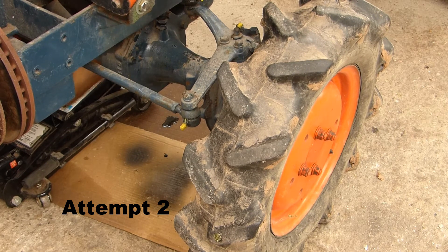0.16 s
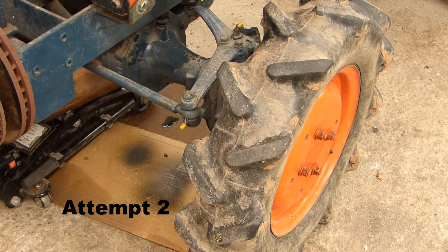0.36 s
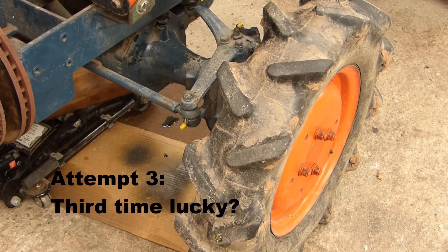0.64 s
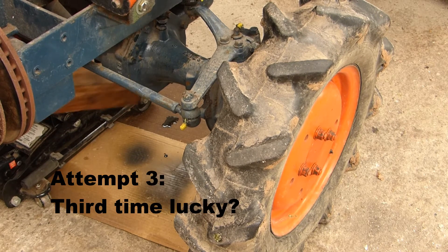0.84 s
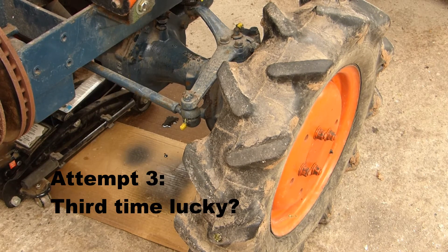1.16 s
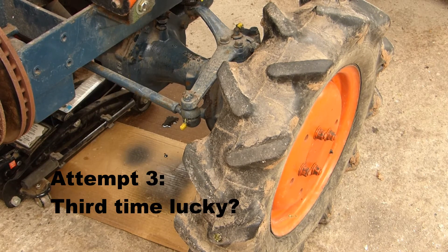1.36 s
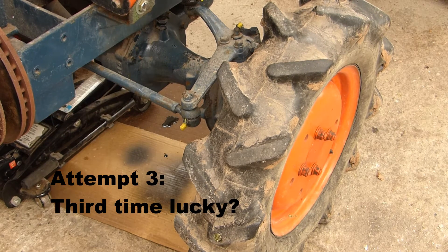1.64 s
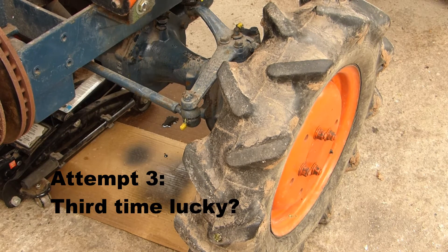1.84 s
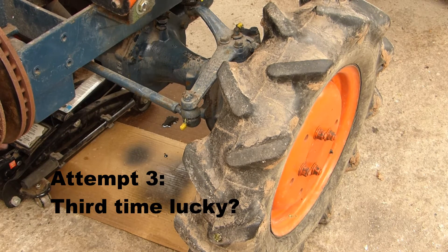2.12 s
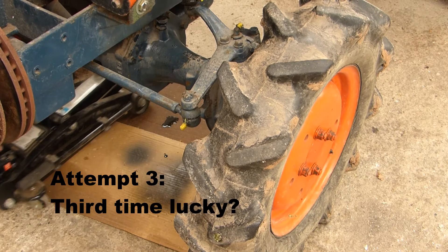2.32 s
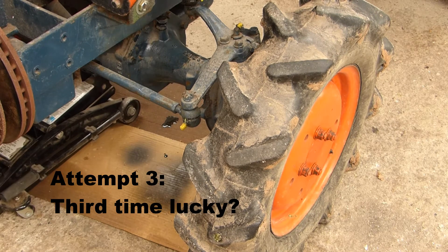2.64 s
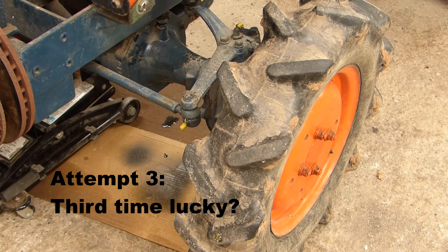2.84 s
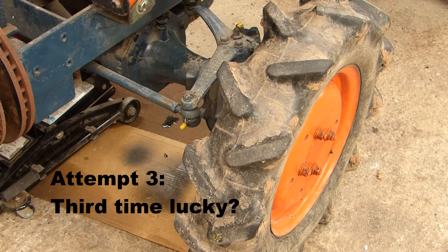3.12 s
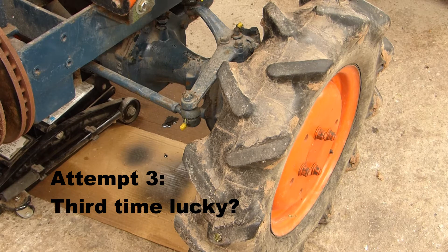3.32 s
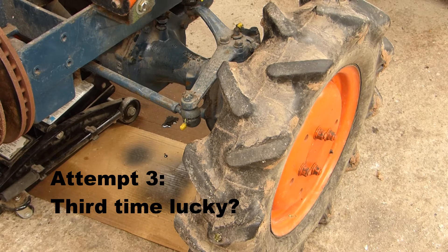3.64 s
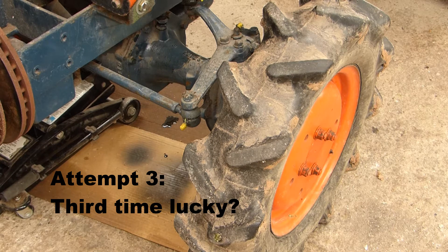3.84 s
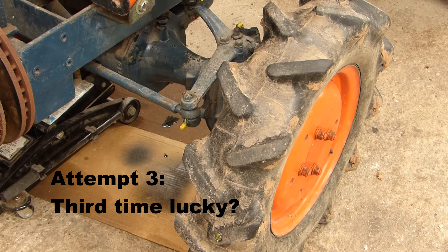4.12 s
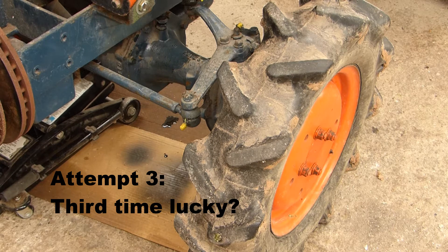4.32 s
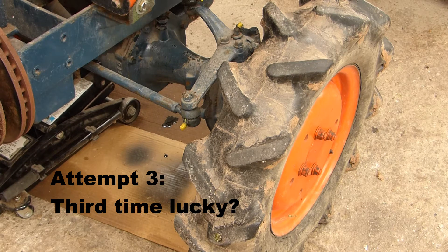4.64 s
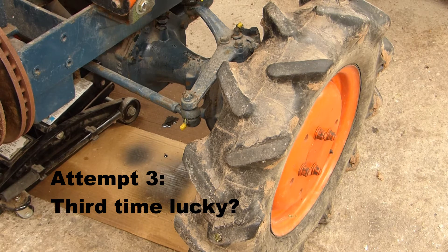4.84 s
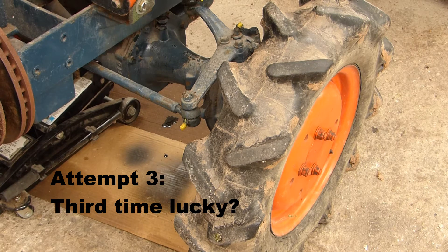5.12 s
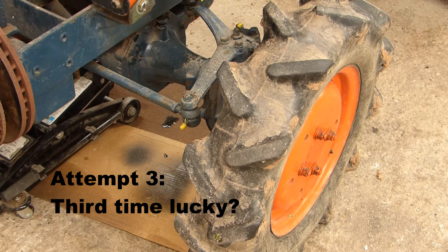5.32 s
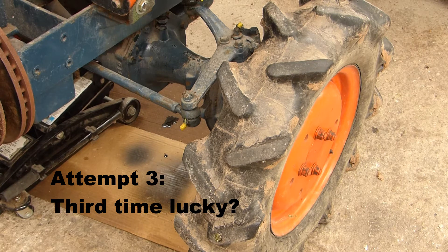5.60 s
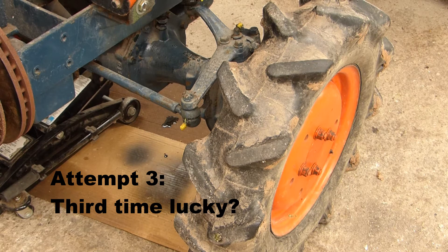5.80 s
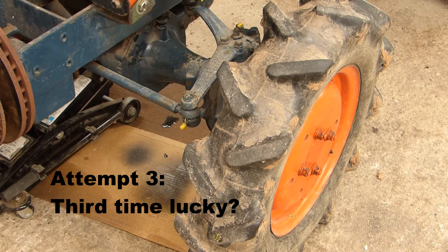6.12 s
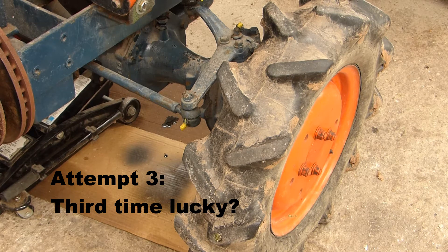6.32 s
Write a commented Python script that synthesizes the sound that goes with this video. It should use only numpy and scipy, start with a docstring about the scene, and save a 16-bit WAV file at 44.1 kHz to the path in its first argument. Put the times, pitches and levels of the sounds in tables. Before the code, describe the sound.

Close stereo sound of a heavy floor jack, slightly left of centre: an early hard steel clank, lighter taps, a pause, then two woody, dull blows, the second very loud. Castors rattle and grind across concrete in one short shove. Repeated pumping follows, with doubled clanks, loose ticks and high metallic pings. Hard garage walls give quick, dense echoes, with only faint room noise beneath.

```python
"""A hard-walled garage that rings for about a second, close to a steel trolley jack under a tractor. The jack
is shifted, two dull knocks follow, and it is shoved over the concrete on its castors. Then its handle is
pumped: the linkage clanks and the pins clink at each turn of the stroke. Contacts are shaped noise bursts that
excite ringing modes; loose parts, squeaks and the knock's ring are decaying, fluttering notes; rolling is noise
shaken by random hops. Noise echoes and faint room air surround it all."""
import sys
import numpy as np
from scipy import signal
from scipy.fft import rfft, irfft, next_fast_len
from scipy.io import wavfile

SR = 44100
rng = np.random.default_rng(int(sys.argv[2]) if len(sys.argv) > 2 else 0)


def bounce(signal):
    """Save signal as a 16-bit WAV file at the path given by the first command-line argument."""
    frames = np.transpose(np.atleast_2d(signal))
    limited = np.clip(frames, -1, 1)
    pcm = np.round(limited * 32767).astype(np.int16)
    wavfile.write(sys.argv[1], SR, pcm)


N = 284886

# ringing modes of the steel frame: (f/Hz, level/dB relative to one another, t60/s)
FRAME_MODES = [(871, 17.5, 0.48), (1303, 13, 0.35), (1897, 3, 0.022), (2100, -14, 0.051), (3860, 9, 0.039),
               (6680, 14, 0.015), (7070, 7, 0.016), (8200, 10, 0.13), (10100, -1, 0.23)]


def amp(db):
    """Decibels to gain."""
    return 10 ** (np.asarray(db) / 20)


def unit(x):
    """Scale to rms 1."""
    return x / np.sqrt(np.mean(x ** 2) + 1e-20)


def along(points, hz):
    """(Hz, value) points read on a log axis."""
    f, v = np.transpose(points)
    return np.interp(np.log(hz + 1), np.log(f + 1), v)


def filtered(x, response):
    """x times a response of frequency."""
    m = next_fast_len(x.shape[-1] + SR // 4, True)
    spectrum = rfft(x, m) * response(np.fft.rfftfreq(m, 1 / SR))
    return irfft(spectrum, m)[..., :x.shape[-1]]


def causal(points, size):
    """Minimum-phase response with the gain of (Hz, dB) points, by folding the cepstrum."""
    cepstrum = irfft(np.log(amp(along(points, np.fft.rfftfreq(size, 1 / SR)))))
    cepstrum[1:size // 2] *= 2
    cepstrum[size // 2 + 1:] = 0
    return np.exp(rfft(cepstrum, size))


def resonances(modes, hz):
    """Summed response of ringing modes; the longer a mode rings, the narrower its peak."""
    total = 0
    for fc, db, t60 in modes:
        width = np.log(1000) / (np.pi * t60)
        total = total + amp(db) * 1j * hz * width / (fc * fc - hz * hz + 1j * hz * width)
    return total


def pair(count, side_db):
    """White stereo noise, mostly alike in both channels."""
    mid, side = rng.standard_normal((2, count))
    side = amp(side_db) * side
    return unit(np.array([mid + side, mid - side]))


def panned(x, pan_db):
    """Lean a sound to the left by pan_db."""
    return x * amp(np.array([[.5], [-.5]]) * pan_db)


def add(track, s, sound):
    """Mix a sound in at time s."""
    start = round(s * SR)
    track[:, start:start + sound.shape[-1]] += sound[..., :N - start]


def contacts(rows, modes, swell_s, ring_db, bass_db, dip_db, edge_db, tick_db, top_db, body_hz,
             rebound_db, rebound_life, size=16384):
    """Slack steel joints graze, chatter as they close, rebound faintly, and set the modes ringing."""
    lead = .01  # s of grazing ahead of the contact
    halving_db = 17  # a contact this much brighter closes in half the time
    edge_share, tick_share = 0.63, 1.21  # how far brightness lifts 5 kHz and 10 kHz
    firm_db, damping = -13.5, 0.45  # firmer blows press the parts together: dB of ring lost per dB
    detune, ring_scatter_db = 0.0081, 3.5  # spread of mode frequency (fraction) and level (dB)
    out = np.zeros((2, N))
    t = np.arange(size) / SR - lead
    hz = np.fft.rfftfreq(size, 1 / SR)
    rebounds = amp(rebound_db) * np.exp(np.minimum(t / 0.0034, -t / rebound_life))
    for s, db, thud, bright in rows:
        # the load on the joint differs at each contact and changes the modes a little
        loaded = []
        for fc, level, t60 in modes:
            loaded_hz = fc * (1 + detune * rng.standard_normal())
            loaded.append((loaded_hz, level + ring_scatter_db * rng.standard_normal(), t60))
        u = np.maximum(t, 0) / (swell_s * 2 ** (-bright / halving_db))
        closing = u * np.exp(1 - u)
        chatter = pair(size, side_db=-11.0) * np.hypot(closing, rebounds)
        edge = edge_db + edge_share * bright
        tick = tick_db + tick_share * bright
        colour = [(70, thud + bass_db), (145, thud), (450, thud), (1100, -1), (body_hz, 0),
                  (3000, edge / 2 + dip_db), (5000, edge), (10000, tick), (15000, tick + top_db)]
        ring = amp(ring_db - damping * max(db - firm_db, 0)) * resonances(loaded, hz)
        struck = irfft(rfft(chatter) * causal(colour, size) * (1 + ring))
        add(out, s - lead, amp(db) * struck)
    return out


def heavy_clanks():
    """Handle and frame clank, ringing the frame's modes."""
    # heavy contacts; from 3.5 s each pump stroke lands hard and turns back more lightly:
    # (t/s, level/dB, thud/dB, brightness/dB)
    clank_rows = [(.047, -32.5, 9.5, -7.5), (.212, -31, 5, -10), (.3058, -6, 3.5, 4),
                  (.3145, -23.5, 4.5, -4), (.665, -30, 16.5, -2.5), (.756, -21, -2, -15),
                  (.95, -19, -6, -9.5), (2.349, -15, -2.5, -9), (3.282, -27, -0.5, -1.5),
                  (3.587, -10, -10.5, -9.5), (3.618, -10, -10, -8.5), (3.625, -17.5, -1, -15),
                  (3.777, -21.5, -4.5, -20), (3.875, -14, -12.5, -16), (4.185, -30, 5, -2),
                  (4.2529, -10, -8, 5.5), (4.266, -7, -10.5, -10.5), (4.582, -19.5, -4, -20),
                  (4.691, -8.5, -31, -32), (4.712, -5.5, -17, -7), (4.935, -6.5, -8.5, -2),
                  (5.161, -17, -0.5, -0.5), (5.287, -20.5, -9.5, -19.5), (5.664, -14.5, -1.5, 6.5),
                  (5.672, -10, -8.5, -4.5), (5.921, -19.5, 2, -3.5), (6.046, -21, -11, -6),
                  (6.315, -38.5, 15, -6), (6.417, -9, -8, -22.5)]
    return contacts(clank_rows, FRAME_MODES, swell_s=0.0016, ring_db=-10.5, bass_db=-28, dip_db=-6,
                    edge_db=-2.5, tick_db=-8, top_db=-20, body_hz=2100,
                    rebound_db=-10.5, rebound_life=0.014)


def light_clinks():
    """Pins and castors clink, ringing higher and more numerous modes."""
    # light contacts: (t/s, level/dB, brightness/dB)
    clink_rows = [(2.39, -17.5, -7), (2.402, -9, 2.5), (2.668, -16.5, 8), (2.86, -17, 3),
                  (2.877, -12, -0.5), (2.913, -12, 3), (2.918, -14.5, 2.5), (3.006, -22, 5.5),
                  (3.134, -38.5, 11), (3.159, -30, 7), (3.256, -38, 12), (3.557, -27.5, -1.5),
                  (3.839, -18, -3), (3.9, -28, 10), (3.916, -17, 2.5), (3.985, -23.5, -14),
                  (4.146, -35.5, 3), (4.22, -27, 3), (4.48, -16.5, -3), (4.564, -27.5, 7), (4.848, -23, 7),
                  (5.2126, -20, 2.5), (5.278, -23, 6), (5.544, -44, 3), (5.589, -27.5, 3),
                  (6.025, -20.5, 2), (6.35, -26, 10)]
    # ringing modes of the pins: (f/Hz, level/dB relative to one another, t60/s)
    pin_modes = [(1750, 3.7, 0.027), (2107, 9.7, 0.036), (4037, 18, 0.099), (6360, 7.8, 0.032),
                 (7710, 5.1, 0.15), (9016, 14.8, 0.025), (9670, 12, 0.33), (9730, 17.1, 0.46),
                 (10550, 18, 0.47), (12200, 21, 0.2), (13250, 25.5, 0.06)]
    thud_db = -7  # the light parts all carry the same small thud
    rows = [(s, db, thud_db, bright) for s, db, bright in clink_rows]
    return contacts(rows, pin_modes, swell_s=0.002, ring_db=-4.0, bass_db=-20, dip_db=-3.5,
                    edge_db=-1.5, tick_db=-3.0, top_db=-19.0, body_hz=2020,
                    rebound_db=-12.0, rebound_life=0.028)


def shoving():
    """Each shove speeds the jack up, then lets it coast, growing duller: gains of whole and treble."""
    # shoves that drag castors and frame over the concrete:
    # (start t/s, length/s, level at top speed/dB, treble at half way/dB)
    shove_rows = [(-.06, 0.29, -45.5, -6), (0.314, 0.24, -36, -7), (0.834, 0.16, -41.5, -1),
                  (0.986, 0.11, -35, -5.5), (1.323, 0.16, -63.5, 13.5), (2.181, 0.087, -70.5, 17),
                  (2.288, 0.18, -45, -0.5), (2.342, 0.35, -19.5, -4), (3.396, 0.081, -41, -16),
                  (3.828, 0.11, -43, 9), (4.525, 0.31, -38.5, -2), (4.67, 0.2, -24.5, 3),
                  (5.95, 0.15, -45, 6.5), (6.313, 0.18, -38.5, -20)]
    push_share = 0.26  # the jack gathers speed for this share of a shove, then coasts to a stop
    speed_power = .7  # the gain grows as this power of the speed
    dulling_db = 9.5  # the treble sinks by this much from the start of a shove to its end
    t, gain, treble_gain = np.arange(N) / SR, np.zeros(N), np.zeros(N)
    for start, length, db, bright in shove_rows:
        u = np.clip((t - start) / length, 0, 1)
        speed = np.interp(u, [0, push_share, 1], [0, 1, 0])
        level = amp(db) * speed ** speed_power
        gain += level
        treble_gain += level * amp(bright - dulling_db * (u - .5))
    return gain, treble_gain


def rolling(bumps_per_s=420, bump_life=0.0037, grind=1.0, jerk_db=2.0):
    """Steel wheels hop over grains of concrete; every hop shakes the frame. The jack moves to the left."""
    # spectrum of wheels on grit: (f/Hz, relative level/dB)
    grit = [(35, -77), (60, -40), (198, -8.5), (294, -16.5), (593, -11), (698, -7), (1090, -2),
            (1280, -1.5), (1780, -2), (2900, -3.5), (8510, -9.5), (13300, -23), (16000, -37)]
    gain, treble_gain = shoving()
    t = np.arange(N) / SR
    hop_sizes = amp(2.2 * np.clip(rng.standard_normal(N), -2, 2))
    hops = (rng.random(N) < bumps_per_s / SR) * hop_sizes
    shake = unit(signal.lfilter([1], [1, -np.exp(-1 / (bump_life * SR))], hops))

    def body(hz):
        """The grit's colour with the frame's modes faintly on top."""
        return amp(along(grit, hz)) * (1 + amp(-26.0) * resonances(FRAME_MODES, hz))

    # the wheels catch and free themselves, so the grains come in clumps
    slow = unit(filtered(rng.standard_normal(N), lambda hz: np.exp(-(hz / 45) ** 2)))
    jerks = amp(jerk_db * slow)
    rattle = unit(filtered(pair(N, side_db=-10.5) * (grind + shake) * jerks, body))
    treble = filtered(rattle, lambda hz: hz ** 2 / (hz ** 2 + 2800 ** 2))
    sound = gain * (rattle - treble) + treble_gain * treble
    return panned(sound, np.interp(t, [2.5, 4.7], [-1, 4.5]))


def knock(s, spectrum, db, size=4096):
    """One clean, dull blow, as of a block set on the saddle: a single filtered push."""
    out, push = np.zeros((2, N)), irfft(causal(spectrum, size))
    add(out, s, amp(db) * push / np.abs(push).max())
    return out


def two_knocks():
    """A soft knock, then a much louder hard one."""
    # spectra of the two blows: (f/Hz, relative level/dB)
    soft_knock = [(29, -84), (50, -45), (267, -2.5), (595, -6.5), (985, -21.5), (1600, -19.5),
                  (2010, -33.5), (3400, -33), (3810, -38), (12000, -38), (15600, -85), (22000, -120)]
    hard_knock = [(40, -76), (121, -9), (370, -7.5), (579, -2), (1300, -2), (1790, -7), (2300, -19.5),
                  (3000, -22.5), (3700, -20), (4500, -29.5), (14000, -46.5)]
    return knock(1.6134, soft_knock, db=-15.5) + knock(1.7934, hard_knock, db=2.04)


def pings():
    """Single notes of loose parts, squeaking castors and the ringing hard knock; the higher the note, the
    faster it flutters."""
    # loose steel parts that sing on after a touch, squeaks of the castors, and the ring of the hard knock:
    # (t/s, f/Hz, level/dB, t60/s)
    ping_rows = [(.17, 7500, -48.5, .76), (.667, 545, -36, 0.35), (0.953, 1554, -26.5, 0.29),
                 (0.951, 4010, -33.5, 0.23), (.953, 467, -46, 1), (1.614, 3450, -49, 0.47),
                 (1.613, 4870, -36, 0.053), (1.8, 3626, -33, 0.46), (2.399, 8720, -9, .063),
                 (2.402, 4020, -18, .24), (2.668, 13100, -23, .15), (2.876, 1760, -24, 0.11),
                 (3.159, 9500, -30, 0.15), (3.841, 4035, -27, 0.61), (3.875, 2004, -19.5, 0.07),
                 (4.253, 6970, -12.5, 0.057), (4.688, 2286, -11, 0.062), (4.933, 7120, -20.5, 0.13),
                 (6.025, 13100, -29, 0.28), (6.418, 1870, -23.5, .14)]
    flutter_ratio, rough_at_db = 2.44, -30  # flutter over the clean note, for a note of this level
    rough_grows = 0.26  # dB of flutter gained per dB of level: hard-hit parts rattle more
    out, t = np.zeros((2, N)), np.arange(SR * 3 // 4) / SR
    for s, hz, db, t60 in ping_rows:
        rough = flutter_ratio * amp(rough_grows * (db - rough_at_db))
        noise = pair(len(t), side_db=-8)
        flutter = unit(filtered(noise, lambda f: np.exp(-(f / (.014 * hz)) ** 2)))
        note = (1 + rough * flutter) / np.hypot(1, rough) * np.sin(2 * np.pi * hz * t)
        onset = 1 - np.exp(-t / 0.00014)
        add(out, s, amp(db - 60 * t / t60) * onset * note)
    return out


def garage(x, gap=0.00022, build=0.0057, size=16384):
    """Echoes off the walls thicken quickly and die away, treble first; their pattern shifts steadily."""
    # how long the garage rings: (f/Hz, t60/s)
    ring_times = [(100, 1), (260, 0.79), (1200, 0.9), (4850, 0.78), (14000, 0.43)]
    # colour of the echo off the walls: (f/Hz, relative level/dB)
    wall_colour = [(60, 7.5), (140, -10.5), (300, 5.5), (1200, 1), (4000, 0.5), (14000, -0.5)]
    out, source = np.zeros((2, N)), np.pad(x.mean(axis=0), (0, size))
    for start in range(0, N, size // 2):  # overlapping pieces, each with its own echo pattern
        hz, age, z = signal.stft(pair(SR, side_db=-6.5), SR, nperseg=256)
        decay_db = 60 * age / along(ring_times, hz)[:, None]
        echo_gain = amp(along(wall_colour, hz)[:, None] - decay_db)
        tail = signal.istft(z * echo_gain, SR, nperseg=256)[1]
        t = np.arange(tail.shape[1]) / SR
        thickening = 1 - np.exp(-np.maximum(t - gap, 0) / build)
        tail = tail * thickening / np.sqrt(.055 * SR)
        piece = source[start:start + size] * signal.windows.cosine(size)
        add(out, start / SR, signal.fftconvolve(piece[None], tail, axes=1))
    return out


def room_air():
    """Faint, steady, wide noise of the room."""
    # spectrum of the room air: (f/Hz, relative level/dB)
    air_colour = [(12, -44), (20, -10), (65, -14.5), (146, 2), (1220, -4.5), (7950, -18), (11400, -17.5),
                  (16000, -40)]
    noise = pair(N, side_db=-2.5)
    return amp(-54.5) * unit(filtered(noise, lambda hz: amp(along(air_colour, hz))))


def scene():
    """The jack close by on the left, the garage around it, and faint room air."""
    clanks, clinks = heavy_clanks(), light_clinks()
    wheels, knocks, notes = rolling(), two_knocks(), pings()
    # each source reaches the walls at a strength of its own
    sent = amp(0.4) * clanks + amp(-1.5) * clinks + amp(1.0) * knocks
    sent = sent + amp(-0.5) * wheels + amp(-11.5) * notes
    direct = panned(clanks + clinks + knocks + wheels + notes, pan_db=1.5)
    return direct + garage(sent) + room_air()


def record(dry):
    """The microphone's signal clips at full scale, then loses all from the band limit up."""
    top_hz = 16100
    return filtered(np.clip(dry, -1, 1), lambda hz: hz < top_hz)


dry = scene()
out = record(dry)
bounce(out)
```